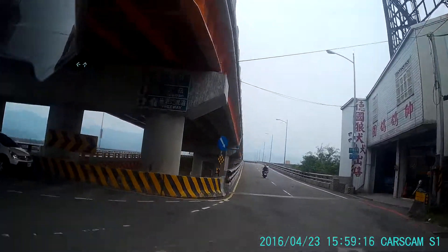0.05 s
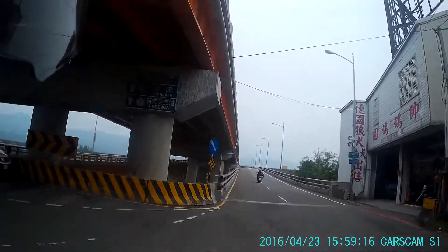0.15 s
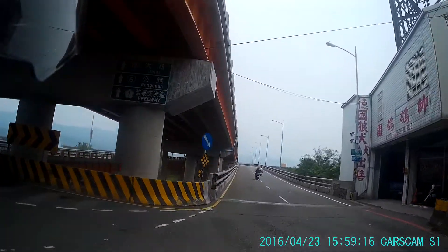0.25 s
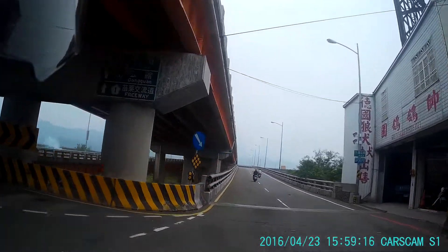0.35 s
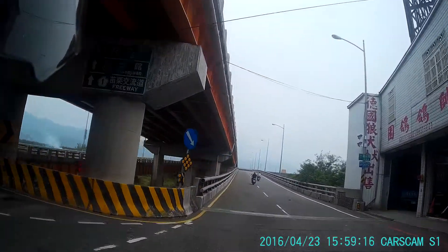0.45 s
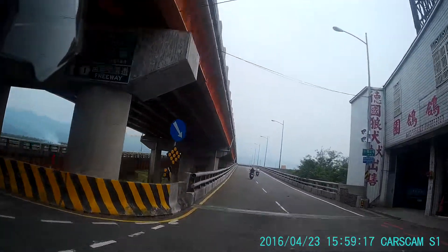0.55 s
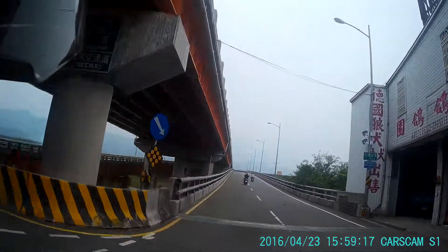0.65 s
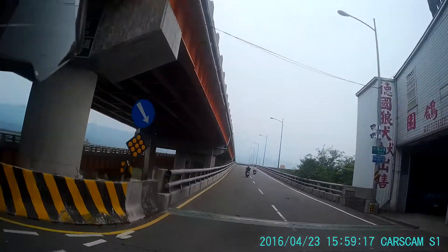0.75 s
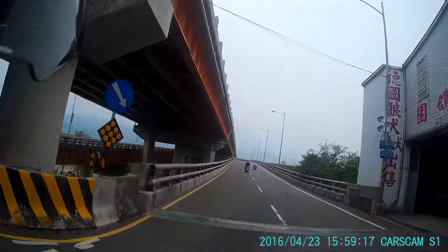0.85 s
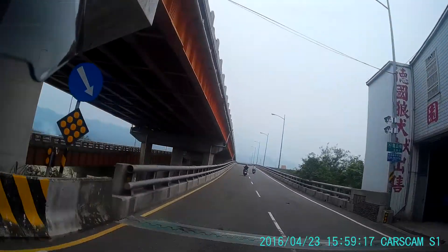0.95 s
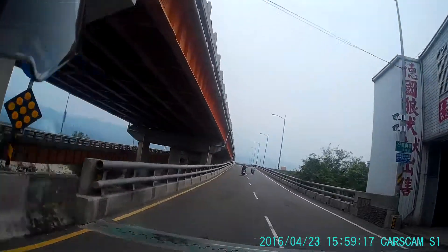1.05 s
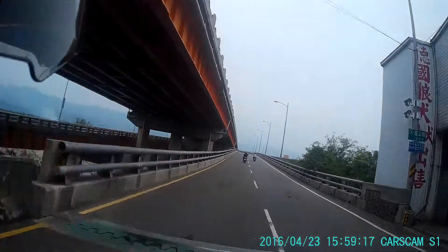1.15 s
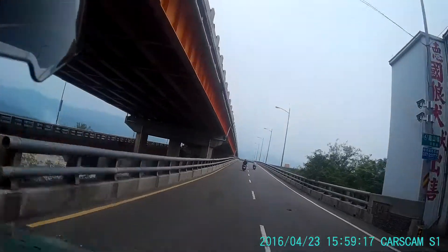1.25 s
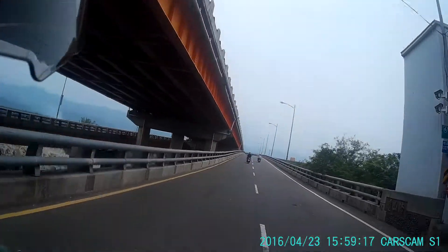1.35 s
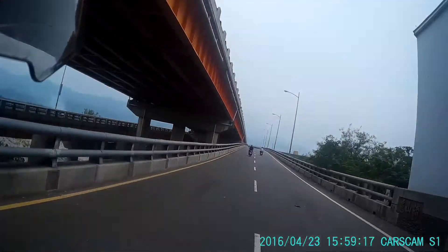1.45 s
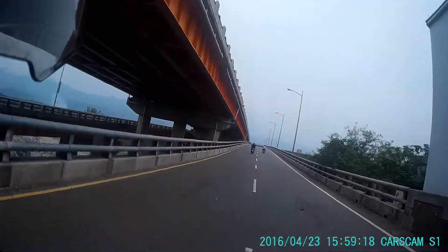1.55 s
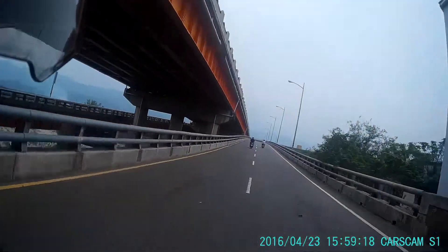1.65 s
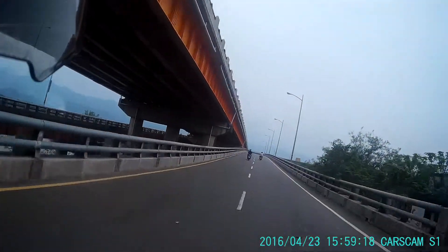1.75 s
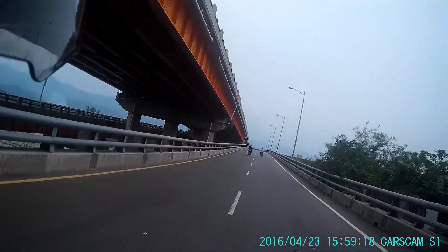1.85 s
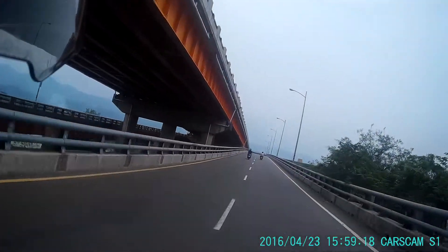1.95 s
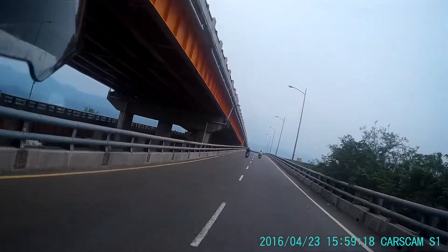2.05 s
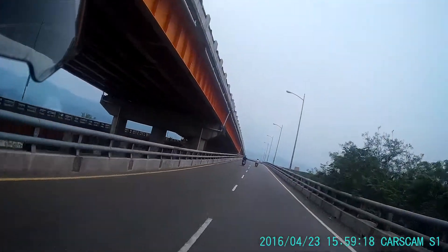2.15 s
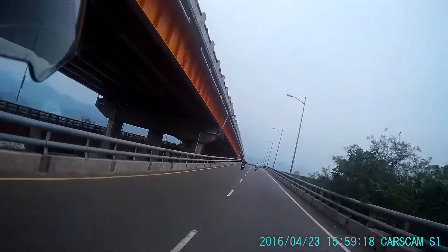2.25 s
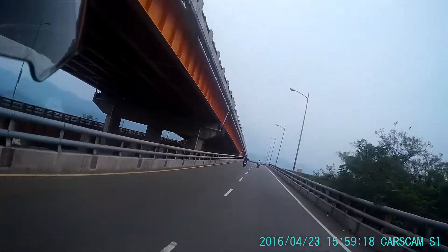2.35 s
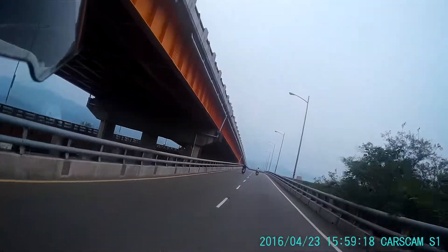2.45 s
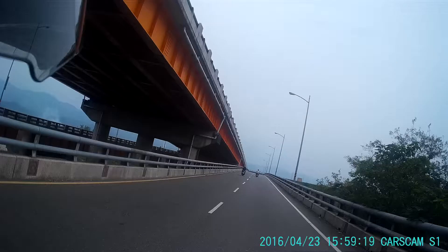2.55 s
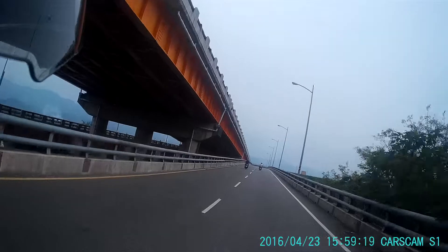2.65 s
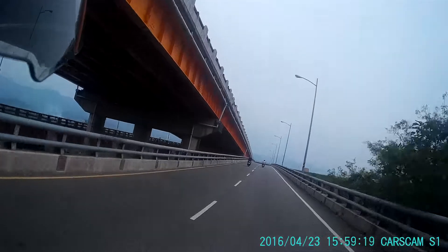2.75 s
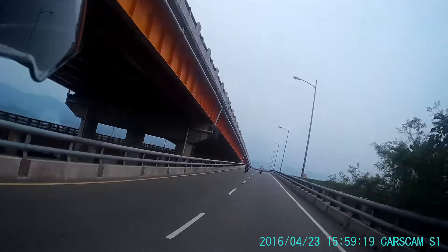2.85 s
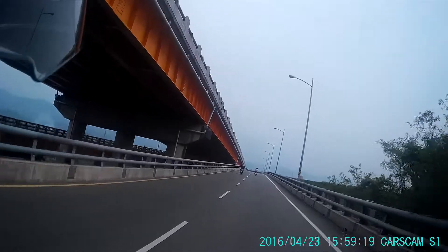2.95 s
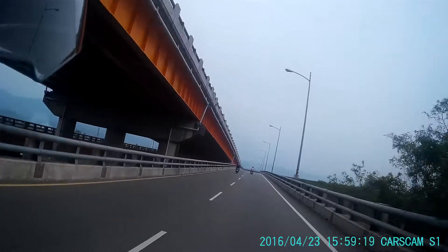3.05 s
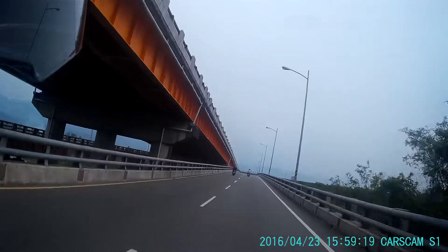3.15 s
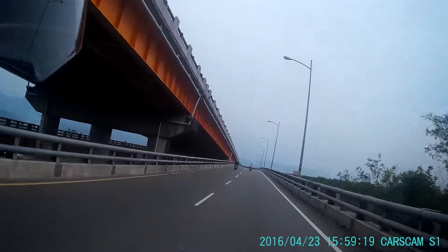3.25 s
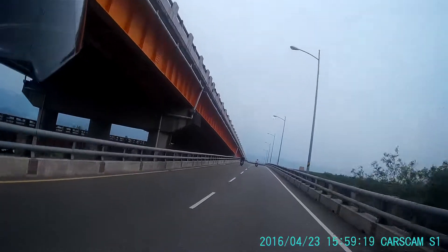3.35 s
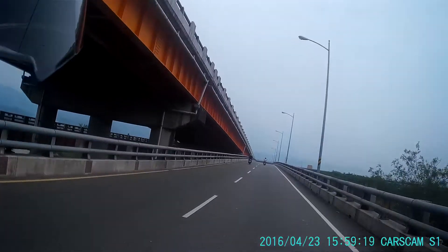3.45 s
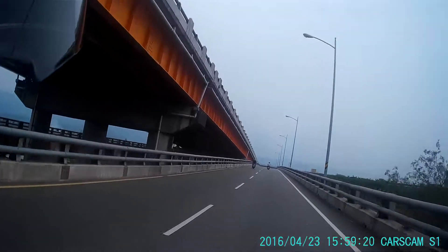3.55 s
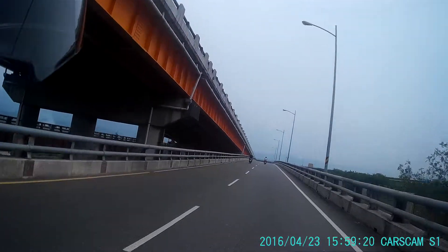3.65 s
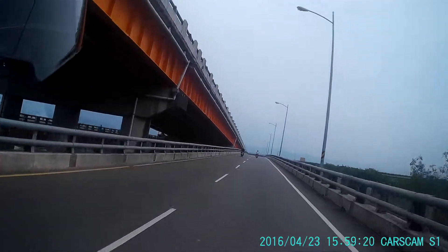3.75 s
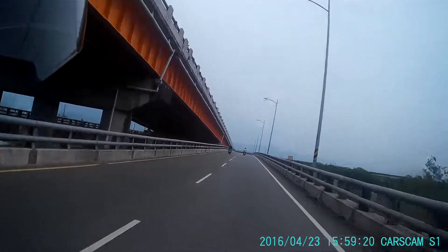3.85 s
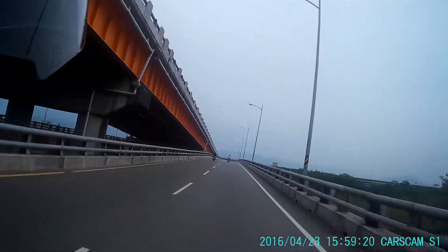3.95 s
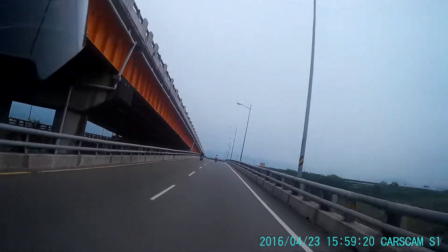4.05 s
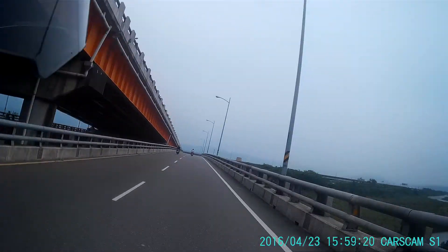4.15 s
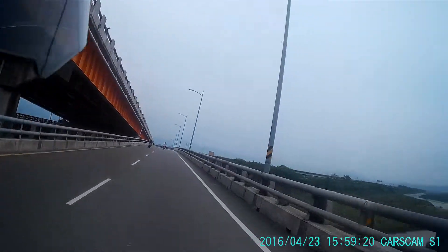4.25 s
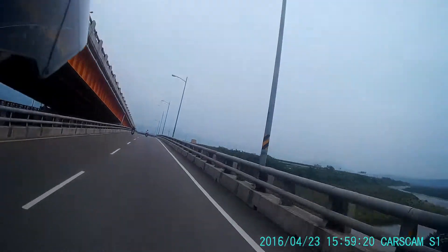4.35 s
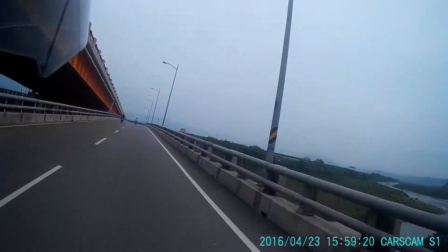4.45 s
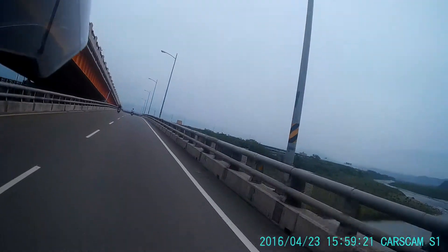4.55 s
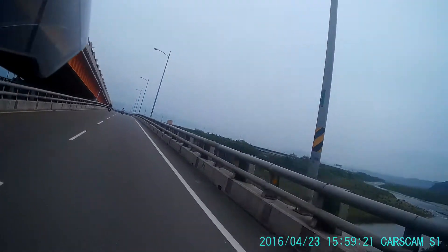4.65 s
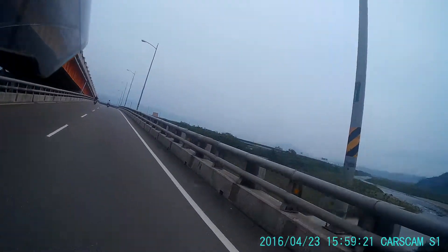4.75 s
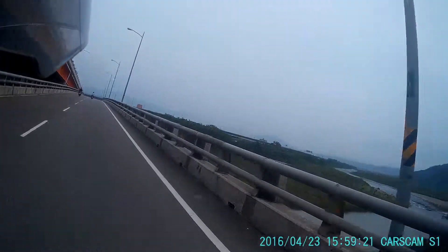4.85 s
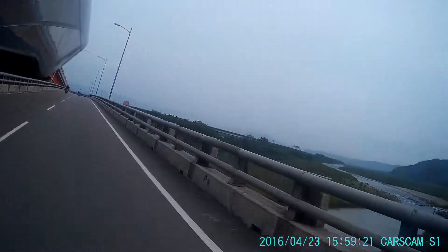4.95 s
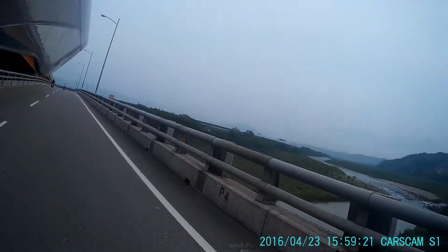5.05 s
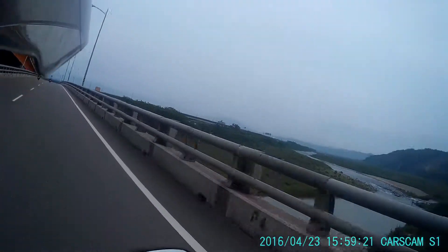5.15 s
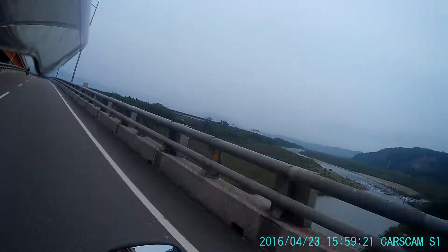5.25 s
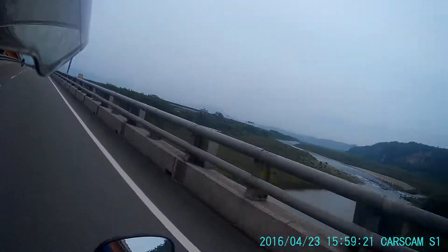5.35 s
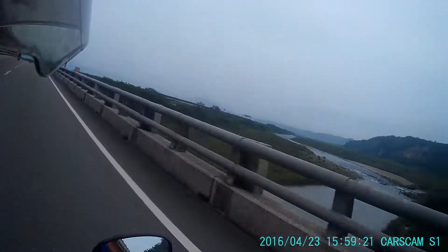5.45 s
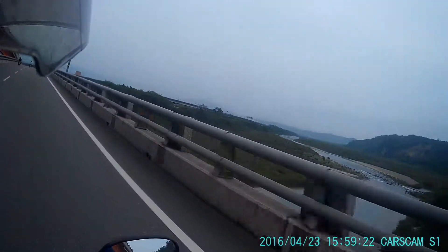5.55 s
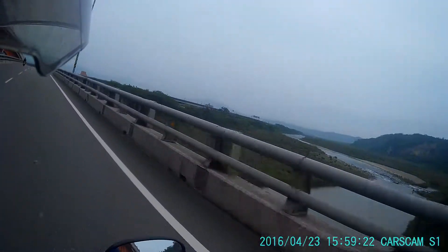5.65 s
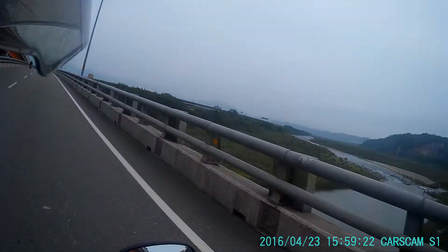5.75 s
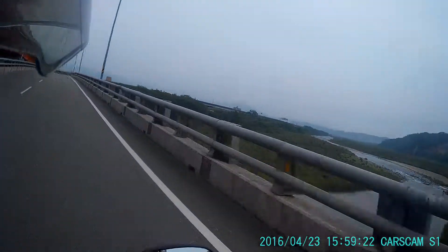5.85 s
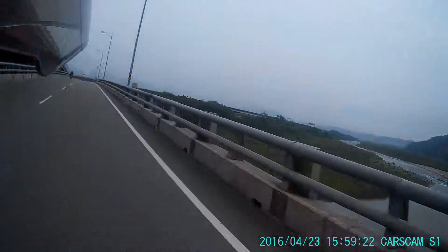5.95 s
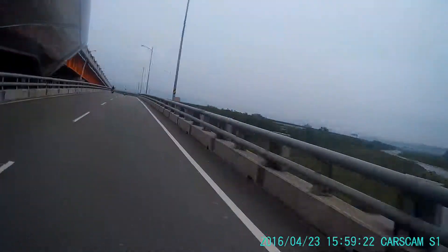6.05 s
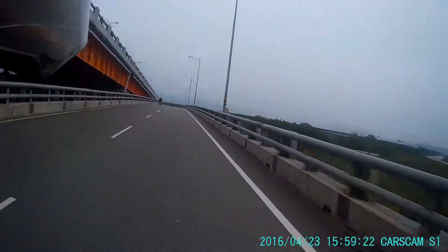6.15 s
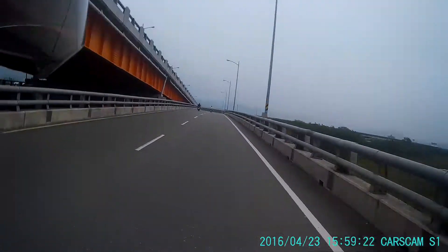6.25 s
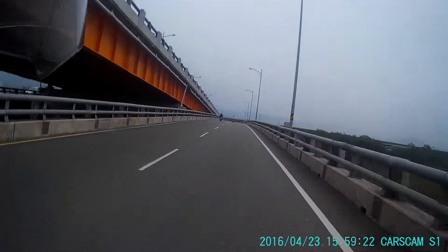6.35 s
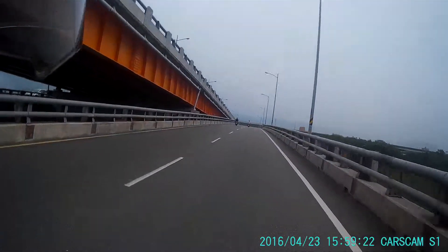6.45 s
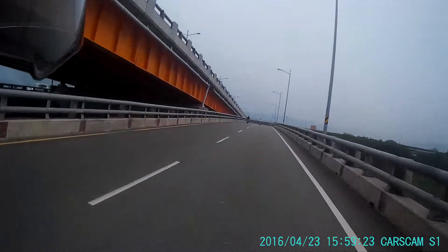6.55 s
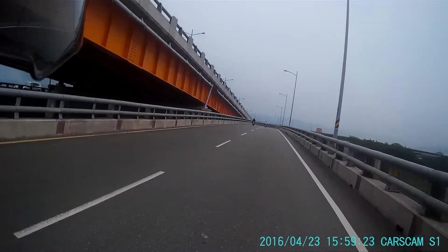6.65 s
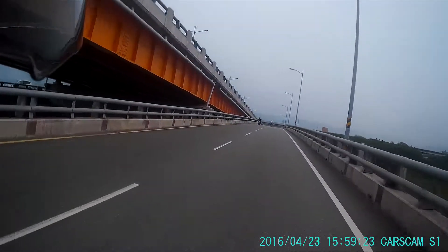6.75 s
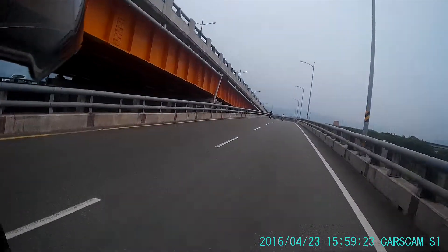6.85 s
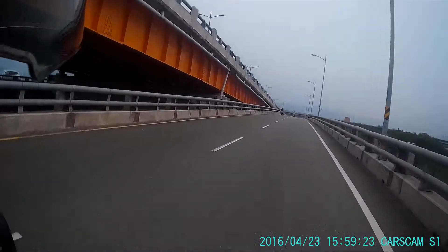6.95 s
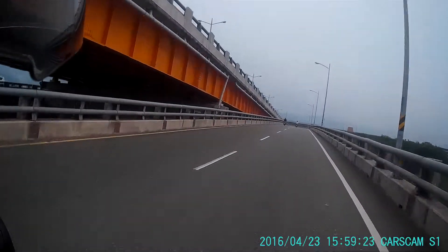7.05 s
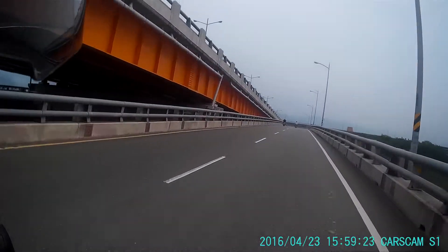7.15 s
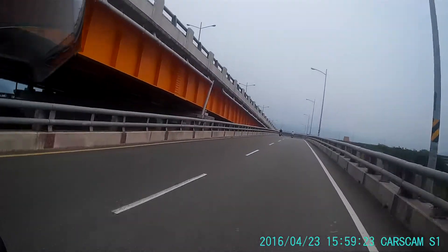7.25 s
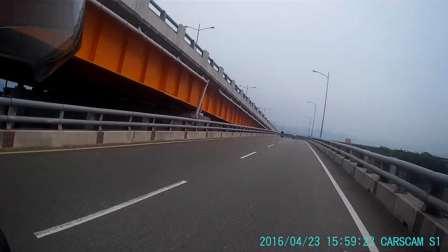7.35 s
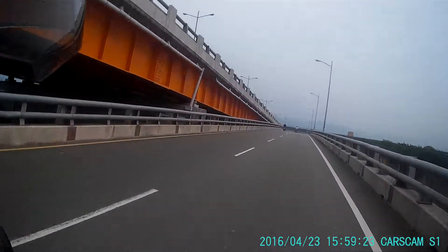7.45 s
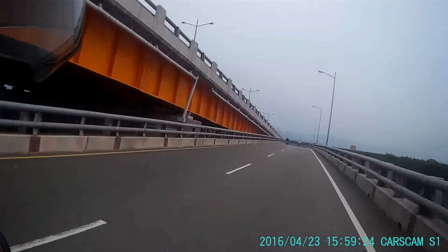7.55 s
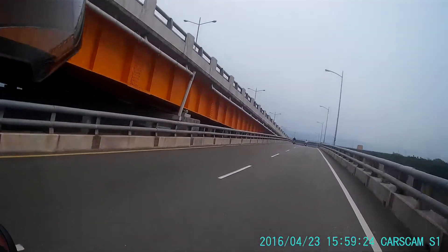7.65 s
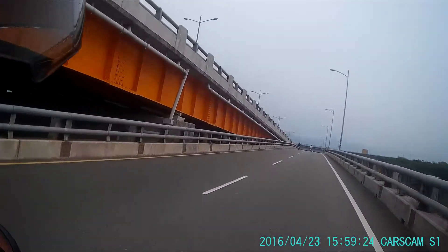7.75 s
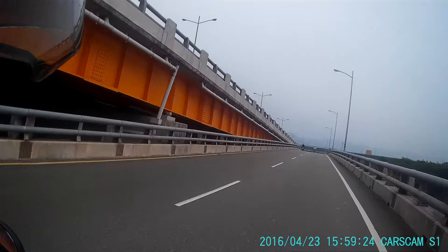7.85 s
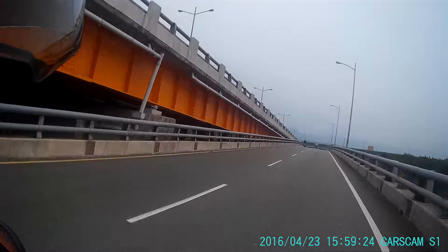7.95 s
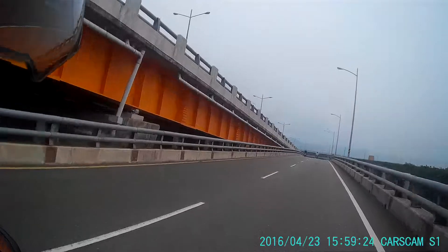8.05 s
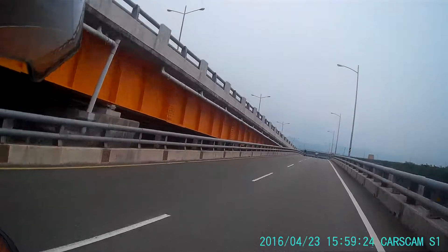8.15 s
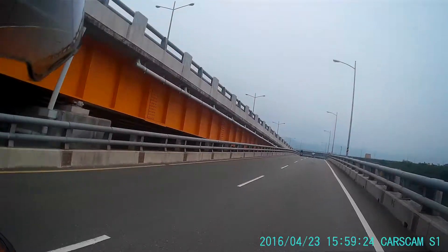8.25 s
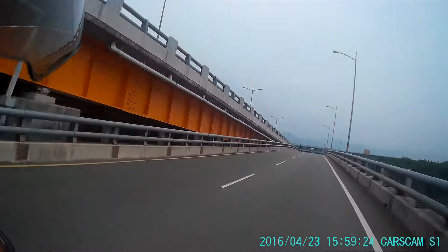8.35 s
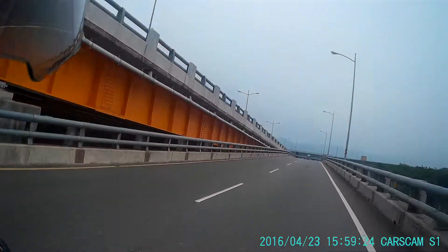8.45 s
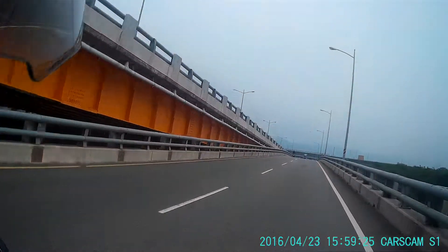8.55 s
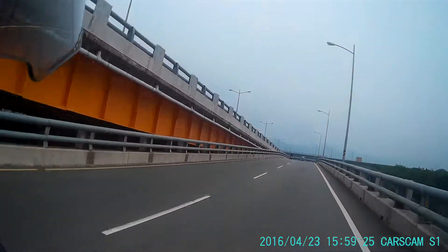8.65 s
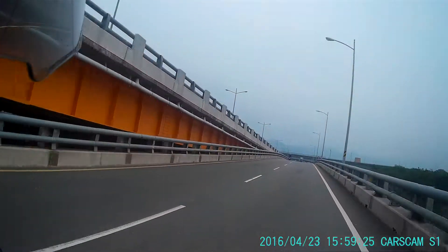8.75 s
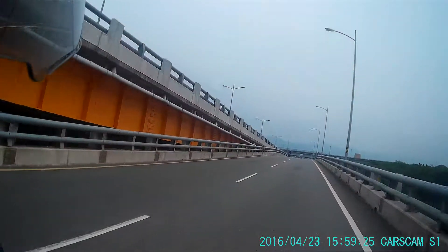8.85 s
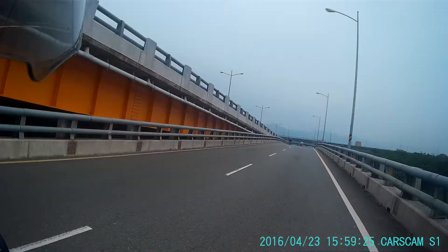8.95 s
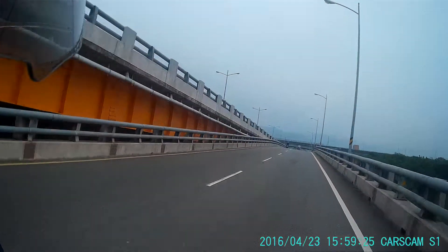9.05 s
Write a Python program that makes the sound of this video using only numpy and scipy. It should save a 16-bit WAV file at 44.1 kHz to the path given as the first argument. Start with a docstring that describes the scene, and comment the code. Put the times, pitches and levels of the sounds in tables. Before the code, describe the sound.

Heard close at a single small microphone outdoors: dull tyre noise under soft hiss, then uneven wind building with a low boom, narrow breathy whistles and brief ringing ticks of the mount. A lull leaves mostly deep buffeting. Wind returns with short scrapes and a low motor hum, then abruptly becomes a loud, hollow, fluttering roar that lasts, with high airy whistling.

```python
"""A small vehicle rides up a ramp, heard from a camera in a plastic case, over dull road and hiss noise.
First a thin sizzle, made of noise in a narrow band, fades away. Noise shaped by the hollow case then
swells as gusty wind, with a low boom and, from about 2 s, narrow noisy whistles and ringing ticks.
From 4 s the camera looks aside and the air mostly buffets low; short scrapes follow and the engine's
few faint sine tones swell. After 6.2 s the camera faces forward and the wind roars."""
import sys
import numpy as np
from scipy import signal
from scipy.fft import rfft, irfft
from scipy.io import wavfile
from scipy.ndimage import uniform_filter1d

SR = 44100
rng = np.random.default_rng(int(sys.argv[2]) if len(sys.argv) > 2 else 0)


def persist_wave(psi):
    """Save psi, clipped to +-1, as 16-bit WAV."""
    counts = np.round(np.clip(psi, -1, 1) * 32767).astype(np.int16)
    wavfile.write(sys.argv[1], SR, np.atleast_2d(counts).T)


N = 400869
TIME = np.arange(N) / SR
FRAME, HOP = 1024, 256  # samples in a slice of sound, and from one slice to the next
FRAME_TIME = np.arange(N // HOP + 5) * HOP / SR
BIN_HZ = np.fft.rfftfreq(FRAME, 1 / SR)

# strength of the air at the case, before gusts: t/s, level/dB
AIR_STRENGTH = [(0, -50.5), (1.3, -47.5), (1.8, -39), (2.25, -42), (2.42, -35), (2.8, -36), (3.25, -30.5),
                (3.85, -28.5), (4.02, -38), (4.9, -46), (5.15, -33.5), (5.8, -31.5), (6.21, -30.5),
                (6.27, -22), (6.9, -19), (7.3, -21), (8.0, -22), (9.09, -25.5)]
# how squarely the air meets the case: t/s, exposure (0 from the side, 1 head-on at speed)
AIR_EXPOSURE = [(0, 0.49), (1.8, 0.54), (2.05, 0.51), (2.3, 0.44), (2.8, 0.37), (3.3, 0.41), (3.82, 0.41),
                (4.0, 0.027), (4.8, 0.017), (5.2, 0.14), (5.65, 0.29), (6.0, 0.085), (6.19, 0.32),
                (6.26, 0.74), (6.9, 0.98), (7.6, 0.93), (9.09, 0.97)]
# gusts, and lulls where negative: middle t/s, length/s (full width), change/dB
GUST_SWELLS = [(.16, .07, -7), (0.927, 0.068, 2.5), (1.096, .05, -8), (1.17, 0.063, 4), (1.63, .12, 1),
               (1.78, 0.19, -6.5), (1.986, 0.25, 5), (2.027, 0.02, 5), (2.476, .06, 1), (3.012, 0.18, 5),
               (3.145, 0.11, -4), (3.265, 0.19, 4), (3.552, 0.049, -4), (3.642, .07, 3), (3.785, 0.047, 4),
               (4.11, 0.1, 3), (4.367, 0.089, 3.5), (4.582, 0.063, 4.5), (4.81, 0.057, -4),
               (4.937, 0.046, -1), (5.0, .06, 3.5), (5.34, 0.1, 1), (5.46, 0.076, -4), (5.663, 0.087, 3.5),
               (6.016, 0.14, -4.5), (6.285, 0.025, 0.5), (6.462, .06, 2), (7.12, 0.056, -2), (7.54, .05, 2),
               (7.81, 0.04, -1.5), (7.984, 0.047, 2), (8.16, 0.038, 2), (8.395, 0.17, -3.5),
               (8.53, .1, 2.5), (8.76, 0.17, -1.5), (8.934, 0.15, 2)]
# relative colour of the air noise: f/Hz, from the side/dB per Hz, oblique/dB per Hz, head-on/dB per Hz
WIND_COLOUR = [(30, -14, 10.5, -7), (120, -8, -6, -11), (250, -9, -4.5, -12.5), (427, -6.5, -5, -9.5),
               (820, -16, -4.5, -7), (1434, -10, 3, -1), (1774, -19, -1.5, -6), (2380, -33, -25, -26),
               (3540, -32, -20.5, -26), (4730, -31.5, -30.5, -36.5), (6780, -37, -26.5, -32.5),
               (8500, -39.5, -27, -31), (11350, -45, -34.5, -37.5), (15500, -37, -35.5, -44)]
# peaks and notches of the case: f/Hz, width/Hz, lift with side air/dB, lift with head-on air/dB
CASE_RESONANCES = [(389.5, 138, 4.5, 5.5), (573, 107, -6, -5), (720, 122, 12, 6), (870, 62, 6.5, 10),
                   (1063.7, 55, 2, 11), (1306, 57, 1, 2.5), (1496, 330, 3.5, 8.5), (1624, 164, -6.5, 1),
                   (2020, 310, -1.5, 6.5), (2800, 620, 5.5, 4), (5350, 480, 3, 9.5), (6090, 680, 10.5, 9),
                   (6750, 630, 2, 12.5), (9880, 790, 10.5, 8), (12900, 480, 8, 11.5), (14600, 500, -1, 3)]
ROAR_DB, HISS_DB = 0.12, -20.5  # against the air strength, before flutter
BRISK_DB = -35.5  # reference air strength for the hiss and the buffeting
HISS_SIDE_DB = -1  # change of the hiss when air comes from the side
HISS_SLOW = .3  # dB of hiss lost per dB of air below BRISK_DB
BUFFET_DB = -42  # in brisk air from the side, before spells and flutter
BUFFET_GROWTH = 0.59  # dB per dB of air strength
BUFFET_HEAD_ON_DB = -14.5  # change when head-on
# heavier spells as the camera swings: middle t/s, length/s (full width), rumble change/dB,
# further boom change/dB
BUFFET_SPELLS = [(2.2, .7, 3, -8), (5.35, 0.31, 5, -6), (5.707, 0.2, 8, 3), (5.867, 0.15, 1.5, 14),
                 (6.048, .08, 5, -9)]
BOOM_HZ, BOOM_WIDTH_HZ = 119.8, 25  # average pitch; width of each of two filter passes
BOOM_DB, BOOM_HEAD_ON_DB = -11, 8  # against the buffeting; change when head-on
# fuzzy whistling in gaps of the case: middle t/s, length/s (full width), f/Hz at the middle,
# glide/Hz per s, width of each of two filter passes/Hz, level at the middle/dB
WHISTLE_SPELLS = [(2.08, .45, 15000, 0, 700, -68), (2.65, .3, 2790, 0, 80, -60),
                  (2.908, 0.076, 3060, -1500, 70, -57), (3.01, 0.21, 6720, 0, 500, -49.5),
                  (3.03, .7, 15000, 0, 700, -68), (3.05, .15, 2900, 0, 100, -55),
                  (3.05, 0.77, 10560, 0, 280, -66), (3.258, .17, 6720, 0, 400, -49),
                  (3.309, 0.24, 2800, -800, 80, -56), (3.58, .2, 3100, 1600, 80, -57),
                  (3.69, .08, 2850, 0, 70, -55), (3.77, .12, 6780, 0, 450, -51),
                  (3.801, 0.4, 2930, 0, 150, -55.5), (3.8, .25, 14900, 0, 400, -69),
                  (4.15, .7, 2830, -150, 150, -65.5), (7.502, 1.0, 8200, 108, 220, -57),
                  (8.006, .1, 7400, -2000, 200, -48), (8.282, .14, 7850, 1200, 90, -60),
                  (8.57, .12, 8100, -4000, 100, -55.5), (8.71, .06, 8300, 0, 150, -54),
                  (9.02, .3, 15000, 0, 600, -59)]
WHISTLE_WAVER_HZ = 45  # rms
SIZZLE_HZ, SIZZLE_WIDTH_HZ = 9860, 480  # average pitch; width of each of two filter passes
SIZZLE_DB, SIZZLE_HOLD_S, SIZZLE_FADE_DB_PER_S = -68.5, 0.31, 16
# engine hum: t/s, average firings per second/Hz, level/dB
ENGINE_COURSE = [(0, 50, -74), (1, 53, -67), (2.5, 65, -60), (4, 58, -59), (5.8, 59.6, -45.5),
                 (6.5, 48, -54), (9.09, 56, -48)]
# its tones: multiple of the firing rate, average level before the hum is evened/dB
ENGINE_TONES = [(1, -1.5), (2, -6), (3, -14)]
# ticks of the mount: start t/s, level before a lift and a soft attack/dB, ring f/Hz
MOUNT_TICKS = [(2.026, -49, 6700), (2.974, -49, 6500), (3.211, -43, 6840), (3.2535, -40, 6700),
               (3.387, -40, 6620), (3.768, -41, 6800), (3.801, -38, 6810), (3.965, -48, 6800),
               (5.346, -45, 6500), (5.772, -46, 6340)]
# scrapes of the mount: middle t/s, length/s (half width), level at the middle/dB
MOUNT_SCRAPES = [(5.283, 0.0083, -51), (5.305, .007, -58), (5.324, .005, -56), (5.349, .004, -54),
                 (5.375, .003, -56), (5.399, .006, -55)]
# soft bumps from the road: middle t/s, length/s (half width), f/Hz, level/dB
ROAD_BUMPS = [(1.328, .045, 28, -46), (4.635, .05, 42, -52)]
# relative colour of tyre and drive noise, before the case: f/Hz, level/dB per Hz
ROAD_COLOUR = [(30, 3.5), (90, -6), (160, 2), (250, -11.5), (450, -5), (800, -8.5), (1450, -3.5),
               (1850, -9), (2350, -26), (3400, -26), (4700, -27.5), (7000, -35.5), (11000, -28),
               (15500, -38)]
ROAD_DB = -51  # average
# relative colour of the microphone's hiss: f/Hz, level/dB per Hz
MIC_COLOUR = [(30, -6), (3000, 0), (5000, -7), (8000, -1), (11000, -12), (15500, 0)]
MIC_HISS_DB = -67.5
EDGE_HZ = 15750  # top of the sound


def gain_of(db):
    """Turns decibels into amplitude."""
    return 10 ** (np.asarray(db) / 20)


def evened(x):
    """Scales a signal to an rms (average strength) of 1."""
    return x / np.sqrt(np.mean(x ** 2) + 1e-20)


def follow(rows, t):
    """Reads each column of a time table at the times t."""
    s, *columns = np.transpose(rows)
    return [np.interp(t, s, c) for c in columns]


def colours(rows):
    """Reads each column of a frequency table at every bin."""
    hz, *columns = np.transpose(rows)
    return [np.interp(np.log(BIN_HZ + 1), np.log(hz), c) for c in columns]


def wander(slow_hz, fast_hz):
    """Random motion of rms 1, mostly between two rates."""
    hz = np.fft.rfftfreq(N, 1 / SR)
    noise = rfft(rng.standard_normal(N))
    return evened(irfft(noise * hz / (hz + slow_hz) / (1 + (hz / fast_hz) ** 2), N))


def swell(s, length):
    """A smooth rise and fall of height 1 around the time s."""
    return np.exp(-np.minimum((2 * (TIME - s) / length) ** 2, 60))


def below(edge_hz, order=8):
    """Share of power that a low-pass keeps in every bin."""
    return 1 / (1 + (BIN_HZ / edge_hz) ** order)


def turbulence(shape, patchy_db):
    """Noise of steady power and given colour, with eddies as brief patches in time and frequency."""
    real, imag, eddies = rng.standard_normal((3, len(FRAME_TIME), len(BIN_HZ)))
    eddies = uniform_filter1d(eddies, size=9, axis=0)
    eddies = evened(uniform_filter1d(eddies, size=11, axis=1))
    shape = shape * gain_of(patchy_db * eddies)
    shape = shape / np.linalg.norm(shape, axis=1, keepdims=True)
    spectrum = (shape * (real + 1j * imag)).T
    return evened(signal.istft(spectrum, nperseg=FRAME, noverlap=FRAME - HOP)[1][:N])


def resonate(x, hz, width):
    """A resonance of gain 1 that follows the curve hz."""
    turn = np.exp(2j * np.pi * np.cumsum(hz) / SR)
    r = np.exp(-np.pi * width / SR)
    return 2 * (turn * signal.lfilter([1 - r], [1, -r], x / turn)).real


def blown_tone(hz, width_hz):
    """Noise, like rough air, rings one narrow resonance twice along the curve hz."""
    once = resonate(rng.standard_normal(len(hz)), hz, width_hz)
    return evened(resonate(once, hz, width_hz))


def case_db(exposure):
    """Resonances of the hollow case, most of them stronger in head-on air."""
    return sum((side + (front - side) * exposure) / (1 + (2 * (BIN_HZ - hz) / width) ** 2)
               for hz, width, side, front in CASE_RESONANCES)


def gusts():
    """How far gusts and lulls move the air strength, in dB."""
    return sum(db * swell(s, length) for s, length, db in GUST_SWELLS)


def wind(air_db):
    """One airstream gives low buffeting, a hollow roar and edge hiss, which flutter together."""
    exposure = np.clip(follow(AIR_EXPOSURE, FRAME_TIME)[0], 0, 1)[:, None]
    side, oblique, front = colours(WIND_COLOUR)
    turn = 2 * exposure - 1  # -1 from the side, 0 oblique, 1 head-on
    colour_db = oblique + np.maximum(turn, 0) * (front - oblique) + np.maximum(-turn, 0) * (side - oblique)
    shape = gain_of(colour_db + case_db(exposure))
    low, not_high = below(232), below(3300)
    aside = 1 - np.clip(follow(AIR_EXPOSURE, TIME)[0], 0, 1)
    # air from the side tears off more unevenly
    flutter_db = wander(3.5, 55) * (0.55 + 0.72 * aside)

    buffet_shape = shape * np.sqrt(low * (1 - below(22, order=4)))
    buffet = gain_of(buffeting_db(air_db) + 0.36 * flutter_db) * turbulence(buffet_shape, patchy_db=5.5)

    roar_shape = shape * np.sqrt((1 - low) * not_high)
    roar = gain_of(air_db + ROAR_DB + 0.92 * flutter_db) * turbulence(roar_shape, patchy_db=0.84)

    hiss_db = air_db + HISS_DB + HISS_SIDE_DB * aside - HISS_SLOW * np.maximum(BRISK_DB - air_db, 0)
    hiss_shape = shape * np.sqrt(1 - not_high)
    hiss = gain_of(hiss_db + 1.1 * flutter_db) * turbulence(hiss_shape, patchy_db=1.04)
    return buffet + roar + hiss


def buffeting_db(air_db):
    """Buffeting grows more slowly than the roar and is stronger with air from the side."""
    spells_db = sum(db * swell(s, length) for s, length, db, _ in BUFFET_SPELLS)
    head_on_db = BUFFET_HEAD_ON_DB * follow(AIR_EXPOSURE, TIME)[0]
    return BUFFET_DB + BUFFET_GROWTH * (air_db - BRISK_DB) + head_on_db + spells_db


def boom(air_db, waver=0.013):
    """Buffeted air booms near one low pitch, standing out more when it meets the case head-on."""
    db = buffeting_db(air_db) + BOOM_DB + BOOM_HEAD_ON_DB * follow(AIR_EXPOSURE, TIME)[0]
    db = db + sum(boom_db * swell(s, length) for s, length, _, boom_db in BUFFET_SPELLS)
    return gain_of(db) * blown_tone(BOOM_HZ * (1 + waver * wander(3, 15)), BOOM_WIDTH_HZ)


def whistles():
    """A gap sounds while the air catches it; its pitch can glide and always wavers."""
    out, waver_hz = np.zeros(N), WHISTLE_WAVER_HZ * wander(3, 18)
    for s, length, hz, glide, width_hz, db in WHISTLE_SPELLS:
        near = abs(TIME - s) < 2 * length
        pitch = hz + glide * (TIME[near] - s) + waver_hz[near]
        out[near] += gain_of(db) * swell(s, length)[near] * blown_tone(pitch, width_hz)
    return out


def sizzle(waver=.004):
    """A narrow band of high fizz holds briefly and fades."""
    db = SIZZLE_DB - SIZZLE_FADE_DB_PER_S * np.maximum(TIME - SIZZLE_HOLD_S, 0)
    return gain_of(db) * blown_tone(SIZZLE_HZ * (1 + waver * wander(3, 15)), SIZZLE_WIDTH_HZ)


def engine():
    """Engine firings hum at multiples of a slightly unsteady rate, each tone wavering in level."""
    hz, db = follow(ENGINE_COURSE, TIME)
    turns = np.cumsum(hz * (1 + 0.022 * wander(0.67, 4.9))) / SR
    hum = sum(gain_of(order_db + 4.6 * wander(1, 7)) * np.sin(2 * np.pi * round(k) * turns)
              for k, order_db in ENGINE_TONES)
    return gain_of(db) * evened(hum)


def ticks(t60=0.018, scrape=0.14):
    """Stiff plastic slips and rings for a few milliseconds, falling 60 dB in t60 seconds."""
    out, t = np.zeros(N), np.arange(SR // 20) / SR
    for s, db, hz in MOUNT_TICKS:
        ring = np.sin(2 * np.pi * hz * t) + scrape * rng.standard_normal(len(t))
        attack = 1 - np.exp(-t / .0003)
        start = round(s * SR)
        out[start:start + len(t)] += gain_of(db + 6.5 - 60 * t / t60) * attack * ring
    return out


def scrapes(hz=7400, width_hz=2300):
    """The mount chatters in short bursts of high noise as the camera swings."""
    rub = blown_tone(np.full(N, hz), width_hz)
    return rub * sum(gain_of(db) * np.exp(-((TIME - s) / length) ** 2) for s, length, db in MOUNT_SCRAPES)


def bumps():
    """A joint in the road rocks the camera in a short, low wave."""
    return sum(gain_of(db) * np.exp(-((TIME - s) / length) ** 2) * np.sin(2 * np.pi * hz * (TIME - s))
               for s, length, hz, db in ROAD_BUMPS)


def road():
    """Nearly steady rolling noise of tyres and drive, coloured by the case."""
    shape = gain_of(colours(ROAD_COLOUR)[0] + case_db(exposure=0.098))
    shape = shape[None]  # the same colour in every slice
    return gain_of(ROAD_DB + .7 * wander(4, 40)) * turbulence(shape, patchy_db=2.2)


def microphone():
    """The microphone's own steady hiss, easiest to hear in the lulls."""
    return gain_of(MIC_HISS_DB) * turbulence(gain_of(colours(MIC_COLOUR)[0]), patchy_db=3.0)


def scene():
    """Adds up everything at the single microphone."""
    air_db = follow(AIR_STRENGTH, TIME)[0] + gusts()
    air = wind(air_db) + boom(air_db) + whistles() + sizzle()
    return (air + engine() + ticks() + scrapes() + bumps() + road() + microphone())[None]


def record(dry):
    """Filters weaken the rumble below 18 Hz and cut the top steeply."""
    dry = signal.sosfilt(signal.butter(2, 18, "highpass", fs=SR, output="sos"), dry)
    top_cut = signal.firwin(511, EDGE_HZ, window=("kaiser", 9), fs=SR)
    return signal.oaconvolve(dry, top_cut[None], "same")


dry = scene()
out = record(dry)
persist_wave(out)
```